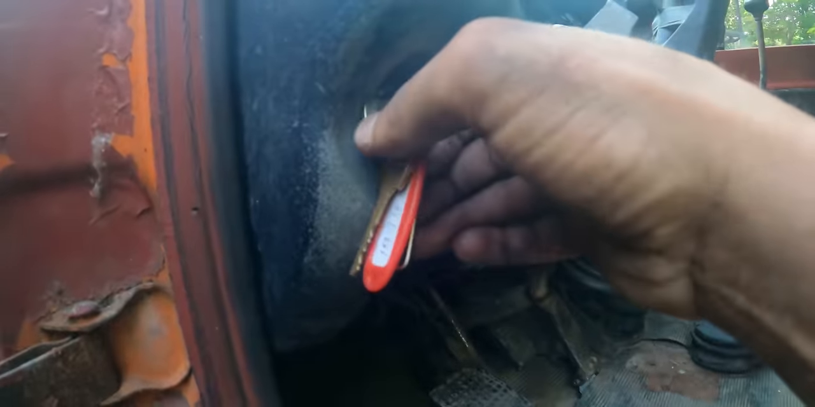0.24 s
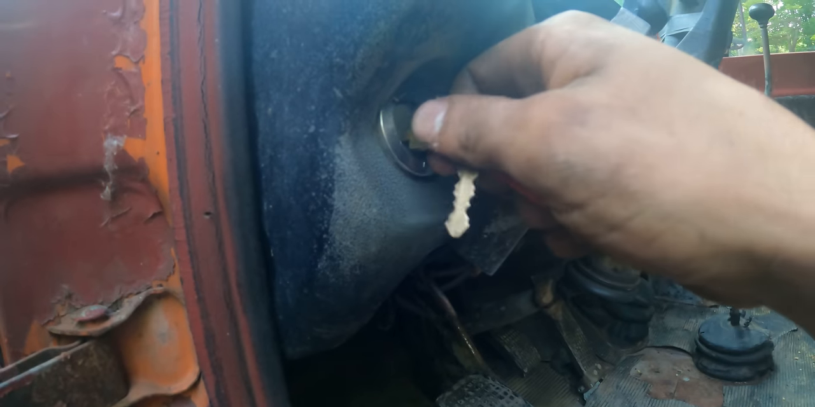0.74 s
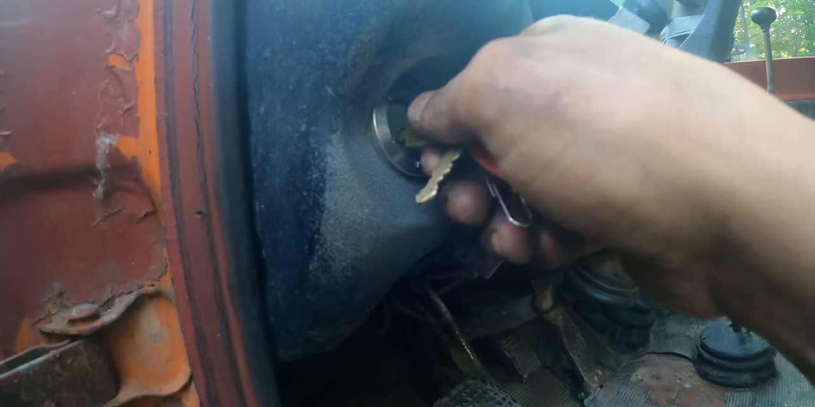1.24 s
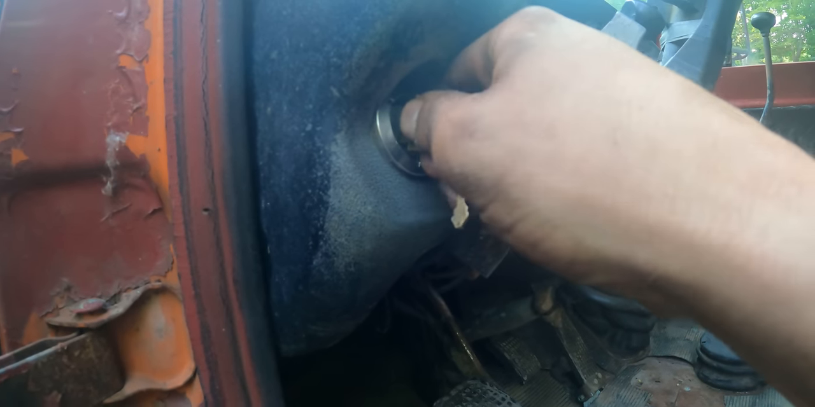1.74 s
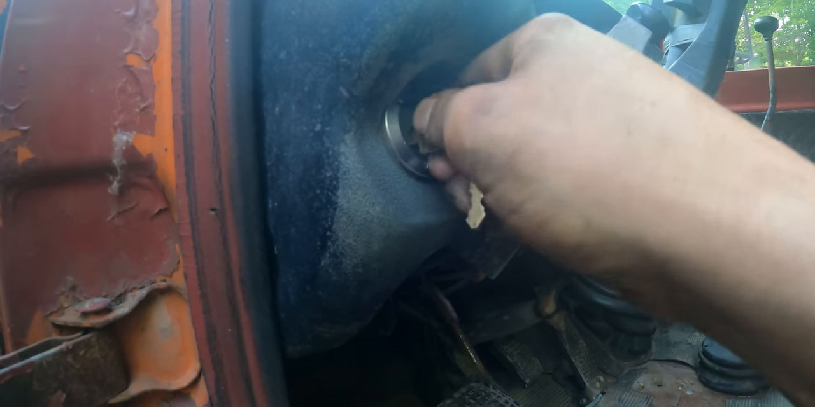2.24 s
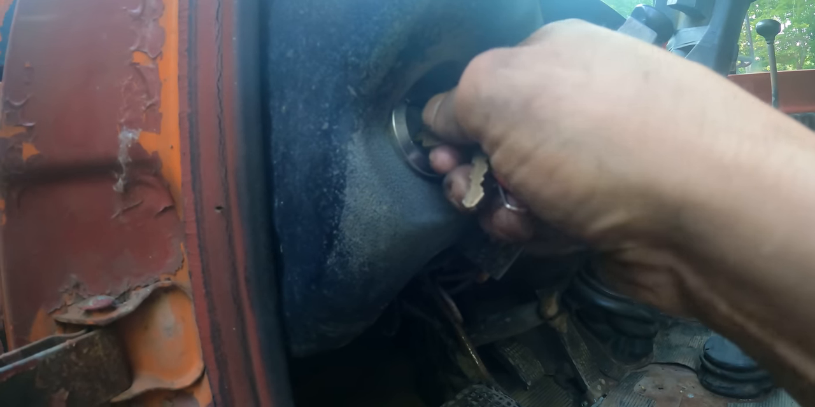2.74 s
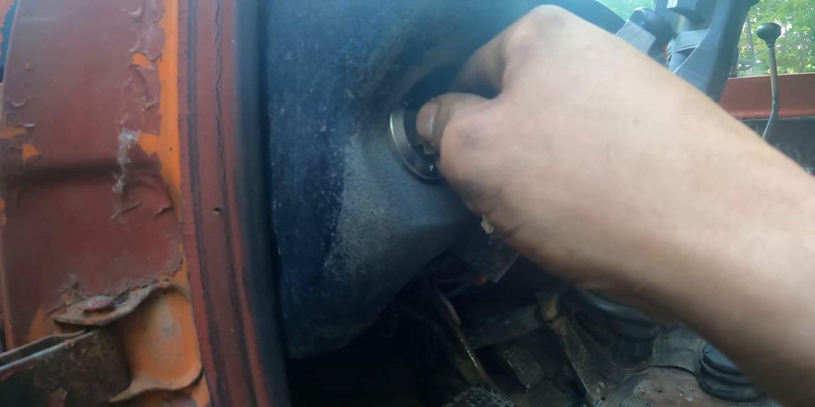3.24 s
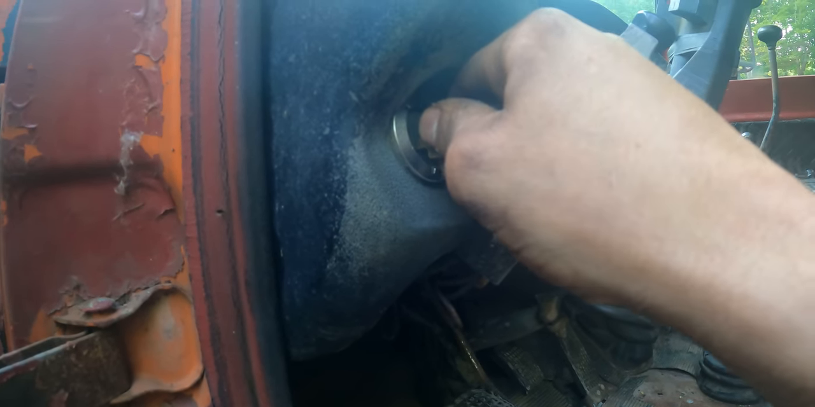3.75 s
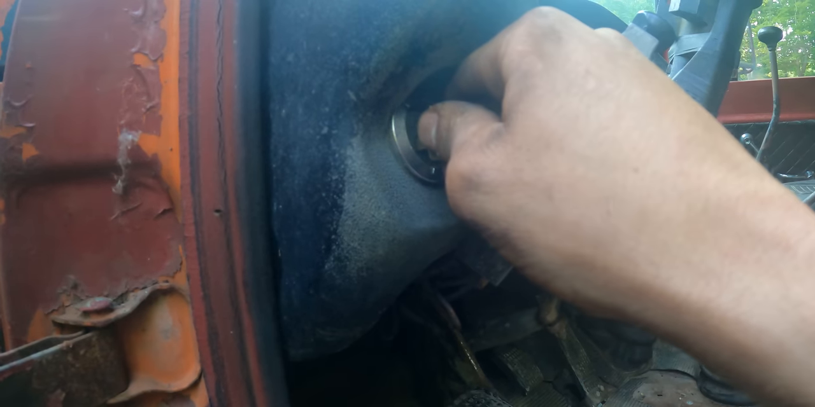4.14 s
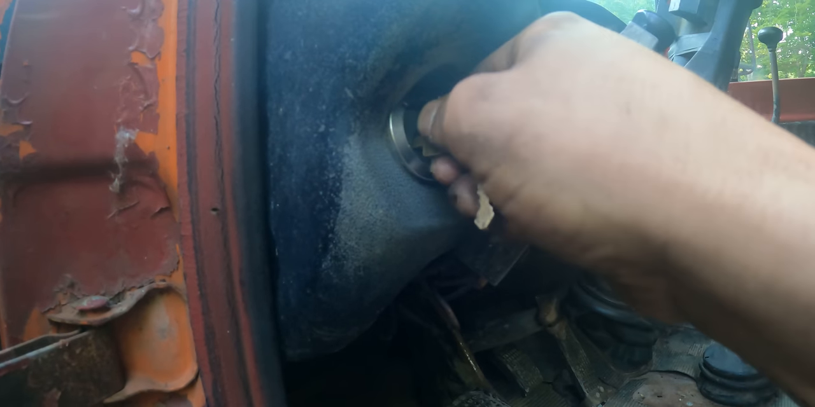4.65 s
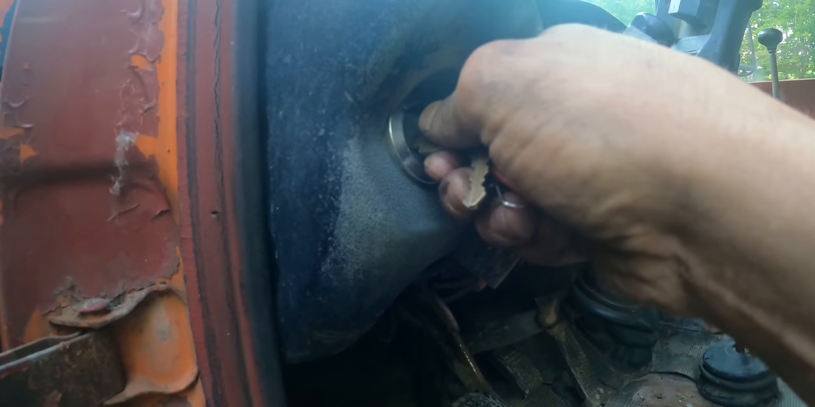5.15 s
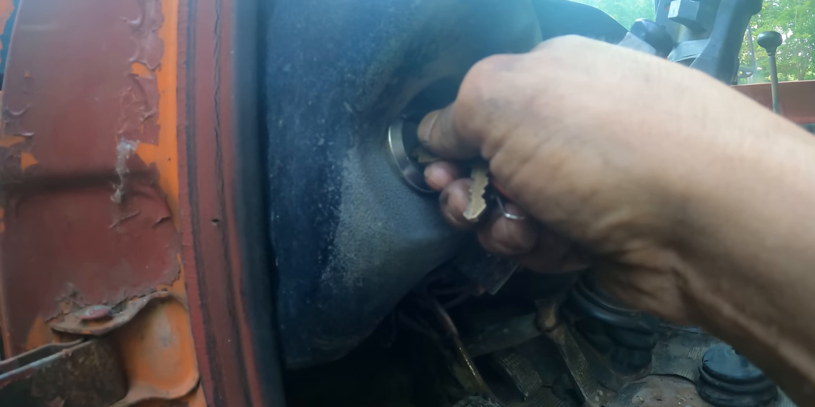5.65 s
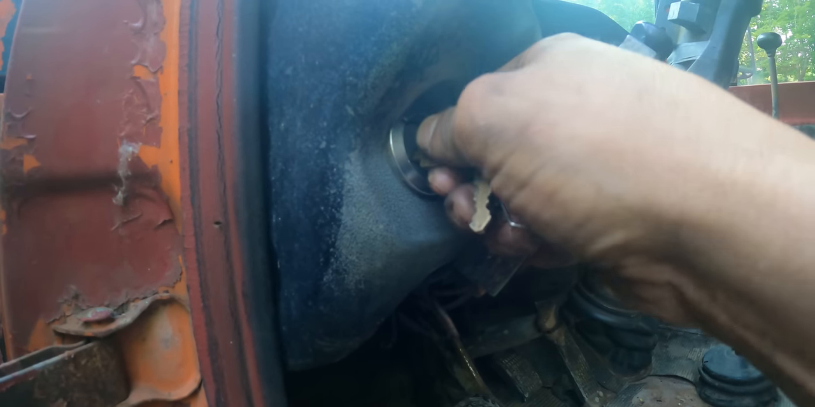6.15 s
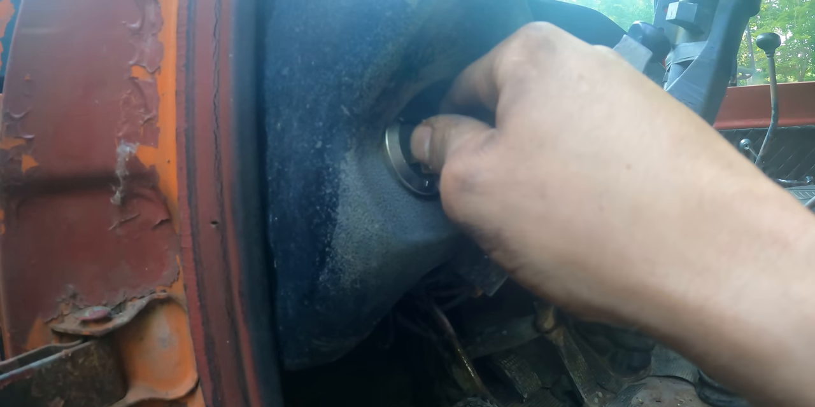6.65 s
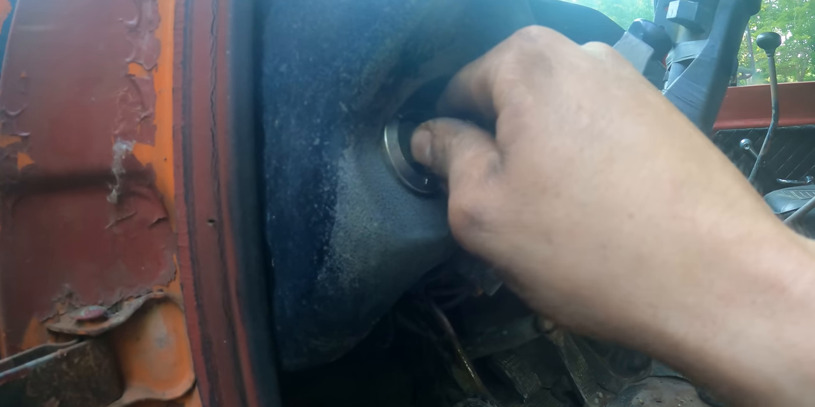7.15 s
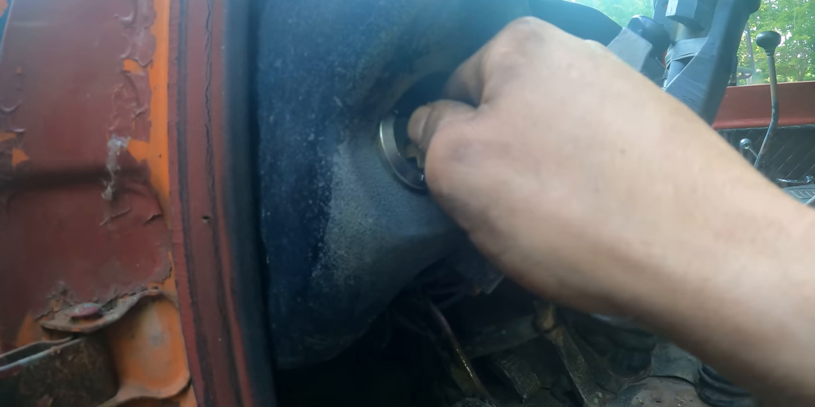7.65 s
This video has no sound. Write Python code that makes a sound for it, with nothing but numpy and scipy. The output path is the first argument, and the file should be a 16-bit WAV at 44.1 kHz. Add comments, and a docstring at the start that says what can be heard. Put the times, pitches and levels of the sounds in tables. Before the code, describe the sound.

Close-up of an ignition switch being worked by hand: bright key clinks with dull dash thuds, a rubbing hiss, and a crisp detent snap. After a quieter pause, a fuel pump jolts on with a low buzzing hum, loose rattles and booming panels, runs about two seconds, winds down and stops on another snap. Soft traffic wash, a faint wavering drone and brief bird phrases lie behind.

```python
"""In the cab of an old truck, a hand turns a key in the steel dash: keys and tag clink, the switch snaps
through its detents. Each contact is a burst of noise that rings the metal and thumps the panel.
An electric fuel pump spins up and runs down; its strokes and rumble shake the cab panels into a loud hum,
and the panels ring out. Outside, a bird of gliding near-sines repeats a short phrase over distant traffic,
made of coloured noise, and a wavering drone."""
import sys
import numpy as np
from scipy import signal
from scipy.fft import rfft, irfft, next_fast_len
from scipy.io import wavfile
from scipy.ndimage import uniform_filter1d

SR = 44100
rng = np.random.default_rng(int(sys.argv[2]) if len(sys.argv) > 2 else 0)


def store_wav(level_fs):
    """Save 16-bit WAV to argv[1]."""
    pcm = np.round(np.clip(np.atleast_2d(level_fs), -1, 1) * 32767)
    wavfile.write(sys.argv[1], SR, pcm.T.astype(np.int16))


N = 347630  # length in samples

# pump motor: switched on, switched off, at rest (s)
ON_S, OFF_S, REST_S = 4.846, 6.59, 7.03
# stroke rate: at the start, at full speed, time to spin up, sag once switched off
START_HZ, FULL_HZ, SPIN_UP_S, SAG_HZ_PER_S = 49.54, 124.2, .354, 170
JOLT_DB, JOLT_S, GRIP_S = 6.5, .03, .004  # extra shake at switch-on, how fast it fades, soft onset
FADE_DB_PER_S = 168.5  # dying away once at rest
# levels at full speed, and gain towards standstill
RUMBLE_DB, RUMBLE_SLOW_DB, HISS_DB, HISS_SLOW_DB = -28.5, 9.5, -61, 11
WHINE_DB = -73  # thin whine of the motor at full speed, before its flutter
KICK_HZ, KICK_DB, KICK_S = 421, -22, .005
LEAD_S = .003  # a contact's noise starts this long before its crack
CHATTER_DB = 3  # random unevenness of the tail before smoothing
CLINK_OCTAVES, CLINK_TAIL_DB = 0.68, -11  # spread of colour; tail under the crack
SNAP_T60_S = 0.2
SWITCH_DB, DASH_DB = -5.5, -5  # ring against the crack
DASH_T60_S = 0.061  # longest ring of the dash under the fingers
TOP_HZ = 15750


def undb(db):
    """Decibels to a plain gain."""
    return 10 ** (np.asarray(db) / 20)


def unit(x):
    """Scale to rms 1."""
    return x / np.sqrt(np.mean(x ** 2))


def columns(rows):
    """Curves at every sample: the first column is time, the others are joined by straight lines."""
    s, *rest = np.transpose(rows)
    return [np.interp(np.arange(N) / SR, s, c) for c in rest]


def pan(x, db):
    """Two channels, the left louder than the right by db."""
    return x * undb(np.array([[db], [-db]]) / 2)


def ring(x, hz, t60):
    """One panel tone, dying by 60 dB in t60 seconds; white noise of rms 1 comes out at rms 1."""
    p = np.exp(2j * np.pi * hz / SR - np.log(1000) / (max(t60, .01) * SR))
    return np.sqrt(2 * (1 - abs(p) ** 2)) * signal.lfilter([1], [1, -p], x).imag


def band(x, hz, width_hz):
    """Resonant band-pass, gain 1 at the centre."""
    return signal.lfilter(*signal.iirpeak(hz, hz / width_hz, fs=SR), x)


def coloured(points):
    """Noise of rms 1 with the given spectrum."""
    hz, db = np.transpose(points)
    size = next_fast_len(N)
    f = np.arange(1, size // 2 + 2) * SR / size
    gain = undb(np.interp(np.log(f), np.log(hz), db, left=db[0] - 44.0, right=db[-1] - 32.0))
    return unit(irfft(rfft(rng.standard_normal(size)) * gain, size)[:N])


def walk(rate):
    """Random levels held 1 / rate s and smoothed twice; spread near 1."""
    k = int(SR / rate)
    held = np.repeat(rng.standard_normal(N // k + 1), k)
    return 1.287 * uniform_filter1d(uniform_filter1d(held, k), k)[:N]


def tint(x, hz, octaves):
    """Spectrum to sound with a bell-shaped colour around hz, peak 1; treble falls off steadily above 9 kHz."""
    f = np.arange(1, len(x) + 1) * SR / (2 * len(x) - 2)
    db = -6 * (np.log2(f / hz) / np.clip(octaves, .04, 3)) ** 2
    db -= 5.6 * np.maximum(f / 1000 - 9.0, 0)
    y = irfft(x * undb(db))
    return y / np.max(abs(y))


def outside():
    """Traffic wash, mostly alike left and right in the bass, with a wavering drone and its octave."""
    # spectrum of the wash: pitch_hz, level_db (per Hz)
    wash_colour = [(15, -47), (32, -0.5), (58, -12), (104, -3.5), (144, -11), (197, -5.5), (278, -20.5),
                   (353, -19), (448, -18), (608, -15.5), (760, -18), (860, -18.5), (960, -14),
                   (1080, -16.5), (1160, -19), (1280, -19.5), (1420, -24.5), (1870, -32), (3100, -44),
                   (3440, -44.5), (6670, -53.5), (10000, -78), (14000, -95)]
    # level of the wash: start_s, level_db
    wash_level = [(0.0, -48), (1.06, -45), (1.75, -46.5), (2.78, -48), (2.98, -49.5), (4.26, -48.5),
                  (5.5, -51.5), (7.3, -54.5), (7.88, -54.5)]
    # gain of the wash's treble: start_s, level_db
    treble_level = [(0, -3), (3, 5), (4.8, 9), (7.1, 7.5), (7.5, 10.5), (7.88, 11.5)]
    # glide of the drone: start_s, pitch_hz, level_db
    drone_glide = [(0, 117.3, -55.5), (0.8, 114.8, -46), (1.5, 108.1, -53.5), (2.2, 106, -49.5),
                   (3, 100.6, -51), (4, 98.3, -56.5), (4.8, 96.8, -62), (7.88, 98, -72)]
    side = signal.lfilter(*signal.butter(2, 330, "high", fs=SR), coloured(wash_colour))
    wash = coloured(wash_colour) + 0.38 * side * np.array([[1], [-1]])
    wash *= undb(columns(wash_level)[0])
    wash *= undb(0.7 * walk(4))
    treble = signal.lfilter(*signal.butter(2, 1600, "high", fs=SR), wash)
    wash += (undb(columns(treble_level)[0]) - 1) * treble
    hz, drone_db = columns(drone_glide)
    phase = 2 * np.pi * np.cumsum(hz * (1 + .01 * walk(10))) / SR
    drone = undb(-7 + 3 * np.tanh(walk(15))) * np.sin(phase + 2.5 * walk(20))
    drone += undb(3 * np.tanh(walk(12))) * np.sin(2 * phase + .5 * walk(14))  # the octave
    return pan(np.ones(1), 1.5) * wash + undb(drone_db) * drone


def whistles():
    """Bird notes and lone tones: soft-edged, slightly rough near-sines that linger among the trees."""
    # notes of the bird's phrase: start_s (within the phrase), length_s, start_hz, end_hz, level_db
    phrase = [(0.006, 0.035, 4500, 4430, -3), (0.043, 0.027, 4280, 3860, -6), (0.061, 0.04, 3850, 3740, -4),
              (0.078, 0.03, 3038, 2876, -6), (0.104, 0.035, 2820, 2700, -2.5),
              (0.13, 0.08, 2626, 2536, -11), (0.136, .075, 3400, 3330, -3.5),
              (.245, 0.06, 2113, 2270, -0.5), (0.298, .08, 2664, 2560, -4)]
    # each time the phrase is sung: start_s, level_db, extra_db of the notes starting above 3600 Hz
    songs = [(1.22, -61, -1.5), (1.718, -60.5, -3), (5.839, -59.5, -7), (6.329, -59.5, -1.5),
             (6.821, -63, 4), (7.326, -60.5, -2)]
    # lone tones: start_s, length_s, start_hz, end_hz, level_db
    tones = [(1.94, 0.063, 371, 381, -41.5), (4.017, 0.056, 3104, 2980, -69.5),
             (5.796, 0.2, 5120, 5160, -64.5), (5.822, 0.051, 1603, 1647, -57)]
    notes = []
    for song_s, song_db, high_db in songs:
        for delay_s, length_s, start_hz, end_hz, db in phrase:
            level_db = song_db + db + high_db * (start_hz > 3600)
            notes.append((song_s + delay_s, length_s, start_hz, end_hz, level_db))
    calls, waver = np.zeros(N + SR), walk(260)
    for start_s, length_s, start_hz, end_hz, db in notes + tones:
        k, i = int(length_s * SR), int(start_s * SR)
        glide = end_hz + (start_hz - end_hz) * np.linspace(1, 0, k) ** 1.2
        waver_hz = .016 * end_hz + .1 * abs(start_hz - end_hz)
        phase = 2 * np.pi * np.cumsum(glide + waver_hz * waver[i:][:k]) / SR
        calls[i:i + k] += undb(db) * np.sin(phase) * np.sqrt(2) * np.hanning(k) ** 0.12
    calls = calls[:N] * (1 + 0.5 * walk(120))  # roughness
    t = np.arange(int(.5 * SR)) / SR
    trees = rng.standard_normal((2, len(t))) * np.exp(-np.log(1000) * t / 0.95)
    echo = signal.fftconvolve(band(calls, 3200, 3000)[None], trees, axes=1)[:, :N]
    return pan(calls, 2.0) * undb(-1.0) + undb(-31.5) * echo


def rustle():
    """Skin and plastic rub: a flickering hiss with tiny ticks."""
    # fingers on keys and tag: start_s, level_db
    rubbing = [(0.0, -74), (0.18, -65), (0.29, -61), (0.8, -60), (0.94, -52.5), (1.13, -65), (1.7, -68.5),
               (2.84, -74), (3.3, -78), (3.6, -81)]
    db = columns(rubbing + [(rubbing[-1][0] + 0.23, -95)])[0]
    # about 300 ticks a second, each fading over 2 ms
    ticks = (rng.random(N) < 300 / SR) * undb(3.6 * np.minimum(rng.exponential(size=N), 4))
    grain = 1 + 0.31 * signal.lfilter([1], [1, -np.exp(-1 / (.002 * SR))], ticks)
    colour = [(1200, -7.5), (2500, 1.5), (4500, 0.0), (7500, -13.5), (10000, -26.0), (14000, -30)]
    hiss = coloured(colour) + .3 * coloured(colour) * np.array([[1], [-1]])
    return undb(db + 2 * walk(47)) * unit(grain) * hiss


def speed():
    """Stroke rate: eases up towards full speed, then sags evenly once the power is cut, to 15 Hz at least."""
    t = np.arange(N) / SR
    hz = FULL_HZ - (FULL_HZ - START_HZ) * np.exp(-(np.maximum(t - ON_S, 0) / SPIN_UP_S) ** 1.45)
    return np.maximum(hz - SAG_HZ_PER_S * np.maximum(t - OFF_S, 0), 15)


def running():
    """Gain of the motor's shaking: off, a jolt, steady, dying away."""
    t = np.arange(N) / SR
    db = JOLT_DB * np.exp(-abs(t - ON_S) / JOLT_S) - FADE_DB_PER_S * np.maximum(t - REST_S, 0)
    return undb(db) * np.sin(np.pi / 2 * np.clip((t - ON_S) / GRIP_S, 0, 1)) ** 2


def pump():
    """Strokes and a rough rumble shake the panels; the fuel hisses and the motor whines from the left."""
    # smaller cab panels: pitch_hz, level_db, t60_s, left_minus_right_db
    panels = [(110, -5, 0.03, 0.8), (180.5, -16, 0.74, -1.5), (204.8, -9, 0.13, -0.5),
              (211.9, -8.5, 0.36, 0.5), (249.7, -8, 0.3, 2), (249.4, -19, 2.33, 2),
              (310.4, -21.5, 0.53, -3.5), (352.9, -9.5, 0.22, 2.5), (387, -10.5, 0.23, 2.5),
              (385, -30.5, 3.6, 2), (396, -36, 2.2, 1), (416, -16, 0.13, -1), (455.8, -25.5, 1.7, 4),
              (462, -31.5, 1.1, 3), (520, -27.5, 0.15, -7.5), (593, -21.5, 0.1, 5.5),
              (680, -28.5, 0.044, 5.5), (935, -36.5, 0.11, 12)]
    # spectrum of the fuel's hiss: pitch_hz, level_db (per Hz)
    hiss_colour = [(700, -13), (1070, -3.5), (1520, -8.5), (2210, -6), (3500, -15), (4900, -16),
                   (5260, -13.5), (5730, -22), (9160, -30), (10300, -39), (10900, -64)]
    # overtones of a stroke: multiple of the stroke rate, level_db
    overtones = [(1, -17), (2, 1.5), (3, -4.5), (4, -13), (5, -16)]
    # level of the strokes: start_s, level_db
    stroke_level = [(4.846, -34), (5.2, -26), (5.4, -36), (5.55, -31), (5.8, -39), (5.95, -28.5),
                    (6.22, -30), (6.36, -39.5), (6.5, -26.5), (6.63, -34), (6.72, -31), (6.85, -30),
                    (7.0, -26)]
    on, slow = running(), 1 - speed() / FULL_HZ  # a slow pump runs rougher
    phase = 2 * np.pi * np.cumsum(speed() * (1 + .003 * walk(30))) / SR
    strokes = sum(undb(db + 1.65 * np.sqrt(k) * walk(18)) * np.sin(k * phase) for k, db in overtones)
    strokes = strokes * undb(columns(stroke_level)[0]) * on
    rumble_db = RUMBLE_DB + RUMBLE_SLOW_DB * slow
    rumble = rng.standard_normal(N) * undb(rumble_db + 0.5 * walk(21)) * on
    shaking = undb(-15.0) * strokes + rumble
    hum = sum(pan((-1) ** k * undb(db) * ring(shaking, hz, t60), left_db)
              for k, (hz, db, t60, left_db) in enumerate(panels))
    direct = undb(-3.5) * strokes + undb(-9) * band(band(rumble, 280, 340), 280, 540)
    since = np.maximum(np.arange(N) / SR - ON_S, 0)
    # the motor jerks into motion
    kick = undb(KICK_DB) * np.sin(2 * np.pi * KICK_HZ * since) * np.exp(-since / KICK_S)
    hum = hum + pan(direct + kick, 2.0)
    # a steep high-pass keeps the hum above about 72 Hz
    hum = signal.sosfilt(signal.butter(4, 72, "high", fs=SR, output="sos"), hum)
    hiss = coloured(hiss_colour) + .5 * np.array([coloured(hiss_colour), coloured(hiss_colour)])
    hiss_db = HISS_DB + HISS_SLOW_DB * slow
    hiss *= undb(hiss_db + 1.5 * walk(15)) * on * np.clip(since / 0.032, 0, 1)
    # the whine sits at 24 times the stroke rate
    hiss += undb(WHINE_DB + 3 * walk(9)) * np.sin(24 * phase) * on * (1 - slow) ** 4
    return hum + pan(hiss, 7.4)


def boom():
    """Low tones of the biggest panels swell as strokes meet them, tremble, then ring on with a level that
    swells and drops."""
    # a panel booms when a multiple of the stroke rate passes its pitch:
    # pitch_hz, width_hz, t60_s, idle_db, then level_db when met by the 1st, 2nd and 3rd multiple
    big_panels = [(91.7, 16, 0.87, -45, -27, -17, -40), (104.8, 4.3, 0.93, -36, -30.5, -16, -40),
                  (132.6, 9.2, 0.42, -41.5, -22.5, -18.5, -22)]
    # level of the boom, rising and dropping also after the pump stops: start_s, level_db
    boom_level = [(4.85, -10.5), (4.98, 4), (5.25, -5.5), (5.42, 3), (5.5, -3), (6.1, 3), (6.5, -0.5),
                  (6.6, -6), (6.72, 2), (6.82, 1.5), (6.95, 4.5), (7.1, -4), (7.55, 7.5), (7.7, -10.5)]
    rate, on, out = speed(), running(), 0
    shaken = np.clip(rate / 30 - 1.2, .15, 1)
    for hz, width_hz, t60, idle_db, *met_db in big_panels:
        push = undb(idle_db)
        for k, db in enumerate(met_db, 1):
            push = push + undb(db) / (1 + ((k * rate - hz) / width_hz) ** 2)
        keep = np.exp(-np.log(1000) / (t60 * SR))
        swell = signal.lfilter([1 - keep], [1, -keep], push * on)
        tone = np.sin(2 * np.pi * np.cumsum(hz * (1 + 0.034 * shaken * walk(24))) / SR)
        out = out + swell * tone * undb(3.65 * shaken * walk(24))
    return np.sqrt(2) * pan(out * undb(columns(boom_level)[0]), .3)


def scrapes():
    """Short scrapes and buzzes: bands of noise that swell and fade."""
    # start_s, length_s, pitch_hz, width_hz, level_db
    strokes = [(0.759, 0.078, 4530, 600, -48), (1.306, 0.27, 5140, 3970, -66),
               (1.886, 0.11, 9470, 3950, -50.5), (5.79, 0.48, 5640, 2060, -63.5),
               (6.569, 0.099, 9200, 3500, -53)]
    out = np.zeros((2, N + SR))
    for start_s, length_s, hz, width_hz, db in strokes:
        k, i = int(length_s * SR), int(start_s * SR)
        noise = band(band(rng.standard_normal(k), hz, width_hz), hz, width_hz)
        out[:, i:i + k] += undb(db) * unit(noise) * np.sin(np.pi * np.linspace(0, 1, k) ** .3) ** 2
    return out[:, :N]


def contact(t, t60, tail_db):
    """Force of one contact: a quick scrape, a crack, a few bounces and a dying chatter."""
    chance = rng.random((3, 2))
    shape = undb(tail_db) * np.exp(-np.log(1000) * t / t60) * np.clip((t - LEAD_S) / 0.0011 + 1, 0, 1)
    uneven = np.repeat(rng.standard_normal(len(t) // 64), 64)  # a new level every 64 samples
    shape *= undb(CHATTER_DB * uniform_filter1d(uneven, 32))
    shape += np.exp(-abs(t - LEAD_S) / np.where(t < LEAD_S, .0004, .0012))  # the crack
    for gap, size in chance:
        late = t - LEAD_S - .004 - .045 * gap
        bounce = np.exp(-late * (late > 0) / .0009) * (late > 0)
        shape += min(3 * t60, .45) * size * bounce * np.exp(-2.5 * gap)
    return shape * rng.standard_normal(len(t))


def rattles():
    """Something loose rattles, from the left, now and then as the pump runs."""
    # start_s, level_db (peak)
    knocks = [(5.004, -40), (5.091, -50), (5.1138, -45.5), (5.154, -45), (5.2645, -50), (5.3542, -55),
              (6.016, -46), (6.2042, -49), (6.238, -51.5), (6.703, -49), (6.7864, -41.5), (6.857, -41),
              (6.9502, -40)]
    out = np.zeros((2, N + SR))
    t = np.arange(8192) / SR
    fade = np.minimum((t[-1] - t) / 0.024, 1)
    for start_s, db in knocks:
        i = int((start_s - LEAD_S) * SR)
        knock = tint(rfft(contact(t, 0.15, -2.5)), 2070, 0.3)
        out[:, i:i + len(t)] += pan(undb(db) * fade * knock, 10.0)
    return out[:, :N]


def contacts():
    """Every contact as (s, dB, Hz, t60, thud dB, octaves, tail dB, treble dB, modes, ring dB)."""
    # keys and tag knock: start_s, level_db, brightest_hz, tail_t60_s, thud_db, treble_db
    knocks = [(0.116, -53, 5000, 0.054, -30, -20), (0.245, -50, 6000, 0.13, -30, -20),
              (0.155, -36, 3500, 0.088, -17.5, -28), (0.269, -37.5, 2540, 0.19, -13.5, -23),
              (0.3141, -32, 2800, 0.88, -37, -21), (0.3346, -14.5, 4830, 0.15, -21, -36),
              (0.3381, -19, 5540, 0.11, -27, -36), (0.3504, -27.5, 1900, 0.16, -39, -40),
              (0.3927, -30, 5200, 0.28, -22, -23), (0.411, -23, 4170, 0.02, -27, -23),
              (0.4173, -22, 5600, 0.013, -39, -15), (0.422, -35, 4800, 0.08, -23, -23),
              (0.471, -40.5, 4860, 0.2, -37, 0), (0.5953, -18, 4600, 0.1, -22, -6),
              (0.6379, -38.5, 3440, 0.13, -6.5, -33), (0.684, -35, 3100, 0.22, -27, -42),
              (0.7565, -40, 4620, 0.15, -27, -25), (0.779, -41, 4720, 0.15, -24, -31),
              (0.858, -20, 4030, 0.064, -16.5, -37), (0.9125, -51, 5070, 0.11, -11, -28),
              (0.9443, -20, 3430, 0.22, -15, -43), (0.96, -34, 5500, 0.052, -26, -14),
              (1.022, -14.5, 4340, 0.14, -16, -16), (1.049, -35, 5000, 0.11, -31, -7),
              (1.1109, -36, 3900, 0.045, -4.5, -26), (1.119, -31.5, 3000, 0.052, -12, -28),
              (1.185, -53.5, 7500, .1, -10, -22), (1.262, -50.5, 3960, 0.099, -7, -30),
              (1.435, -38.5, 4200, 0.16, -14, -31), (1.616, -46.5, 4270, 0.04, -9, -30),
              (1.6393, -26.5, 4330, 0.047, -18, -32), (1.6488, -22.5, 3550, 0.088, -31, -40),
              (1.836, -55, 5014, 0.034, -30, -30), (1.8538, -41.5, 3020, 0.95, -22, -11),
              (1.8925, -29.5, 2800, 0.14, -9, -3.5), (1.9687, -41, 3200, 0.11, -12, -23),
              (1.987, -52, 2790, 0.16, -17, 2), (2.193, -36.5, 3760, 0.065, -15, -16),
              (2.2751, -35.5, 4180, 0.11, -16, -31), (2.3462, -41, 3300, 0.22, -11, -4.5),
              (2.458, -37, 4030, 0.13, -22, -29), (2.8903, -39, 3930, 0.14, -12.5, -36),
              (3.0492, -57, 5590, 0.083, -30, -38), (3.231, -48.5, 2710, 0.16, -21, -19),
              (3.263, -46, 5700, 0.1, -29, -11), (3.3174, -56, 2850, 0.23, -26, -3),
              (3.499, -58, 2780, 0.11, -20, -29), (4.336, -49.5, 4800, 0.31, -12, -25),
              (4.436, -33, 3770, 0.1, -19, -10), (4.5165, -35, 3540, 0.11, -13, -18),
              (4.6785, -47, 2950, 0.25, -25, -28), (4.777, -41, 2860, 0.15, -18, -41),
              (6.513, -50, 5500, 0.59, -23, -44), (6.575, -31.5, 3430, 0.18, -17, 0.5),
              (6.9688, -34.5, 2900, 0.094, -31, -33), (7.444, -56, 6000, 0.17, -18, -10),
              (7.5732, -49, 3300, 0.19, -25, -36), (7.635, -57, 4200, 0.19, -26.5, -38)]
    # the switch snaps into a detent: start_s, level_db, brightest_hz, spread_octaves, thud_db, treble_db,
    # slip_s (how long before landing the cam slips), slip_db (against the landing), tail_db
    snaps = [(2.649, -8, 2980, 1.14, -17.5, -36, 0.0064, -13, -17.5),
             (4.8743, -6.5, 3240, 0.78, -20, -15.5, .0038, -10.5, -18.5),
             (6.9985, -8.5, 3140, 0.58, -23, -22, 0.0075, -21, -20)]
    # tones of the dash: pitch_hz, level_db, t60_s (left free; shortened below)
    dash_tones = [(1800, 1, 0.36), (2205, 4, 0.065), (2980, -11.5, 0.23), (3607, -5, 0.3),
                  (3996, -7.5, 0.44), (4940, 2.5, 0.06), (5200, -12.5, 0.096), (5270, -2.5, 0.11),
                  (5830, -17, 0.54), (6170, -9, 0.18), (6740, -9.5, 0.25), (7700, -5, 0.22)]
    # tones of the switch barrel: pitch_hz, level_db, t60_s
    switch_tones = [(1057, 3.5, 0.07), (1192, -4.5, .06), (1420, -7, .05), (1815, 0, 0.06),
                    (2107, -9, 0.051), (2920, -0.5, 0.013), (3160, 2, 0.02), (3500, -6, 0.057),
                    (3830, -3, 0.03), (4510, -6, 0.11), (4790, -4.5, 0.03), (5700, -2.5, 0.054),
                    (7520, 0.5, 0.028), (8500, -2, 0.014)]
    dash, switch = np.transpose(dash_tones)[:, :, None], np.transpose(switch_tones)[:, :, None]
    dash[2] = np.minimum(dash[2] * 0.17, DASH_T60_S)  # the fingers damp the dash
    rows = [(s, db, hz, t60, thud_db, CLINK_OCTAVES, CLINK_TAIL_DB, treble_db, dash, DASH_DB)
            for s, db, hz, t60, thud_db, treble_db in knocks]
    for s, db, hz, octaves, thud_db, treble_db, slip_s, slip_db, tail_db in snaps:
        # the slip, brighter and broader in colour, then the landing
        for early_s, less_db, broader, higher in [(slip_s, slip_db, 1.1, 1.35), (0, 0, 1, 1)]:
            rows.append((s - early_s, db + less_db, hz * higher, SNAP_T60_S, thud_db,
                         octaves * broader, tail_db, treble_db, switch, SWITCH_DB))
    return rows


def panel_thud(t):
    """The panel answers a contact late with dull noise, its deepest part dying slowest."""
    noise = rfft(rng.standard_normal(len(t)))
    body = unit(tint(noise, 220, 0.77)) * np.exp(t / 0.041)
    body += 0.6 * unit(tint(noise, 1065, 0.2)) + 0.66 * unit(tint(noise, 1818, 0.07))
    body += 1.73 * unit(tint(noise, 1600, 1.0))
    return body * np.exp(-np.log(1000) * t / 0.13) * np.minimum(t / 0.015, 1)


def clinks():
    """Each contact of keys or switch cracks, rings the metal near its own colour and thumps the panel."""
    out = np.zeros((2, N + SR))
    t = np.arange(8192) / SR
    fade = np.minimum((t[-1] - t) / 0.024, 1)
    for s, db, hz, t60, thud_db, octaves, tail_db, treble_db, (f, mode_db, mode_t60), ring_db in contacts():
        # every contact rings the metal a little differently
        chance = rng.standard_normal((2, len(f), 1))
        modes = undb(mode_db + 2.2 * chance[0]) * np.sin(2 * np.pi * f * (1 + .006 * chance[1]) * t)
        modes = np.sum(modes * np.exp(-np.log(1000) * t / mode_t60), axis=0)
        force = rfft(contact(t, t60, tail_db))
        sound = tint(force, hz, octaves)
        sound += undb(ring_db) * tint(force * rfft(modes), hz, 1.41 * octaves)
        sound += undb(thud_db) * panel_thud(t)
        # the after-rattle has its own colour, 1.2 octaves wide
        after = rng.standard_normal(len(t)) * np.exp(-np.log(1000) * t / t60) * np.minimum(t / .006, 1)
        sound += undb(tail_db - 5.5) * tint(rfft(after), 0.96 * hz, 1.2)
        treble = undb(treble_db) * tint(rfft(contact(t, 0.39 * t60, tail_db)), 9900, 1.0)
        # the cab scatters it to both sides
        spread = undb(-16.5) * tint(rfft(contact(t, t60, tail_db + 13.5)), hz, 1.7 * octaves)
        spread += .3 * treble + .2 * np.roll(sound, shift=16)
        both = pan(sound + treble, -1.2) - spread * np.array([[1], [-1]])
        i = int((s - LEAD_S) * SR)
        out[:, i:i + len(t)] += undb(db) * fade * both
    return out[:, :N]


def scene():
    """Everything heard at once, from the background to the keys and switch."""
    return outside() + whistles() + rustle() + pump() + boom() + scrapes() + rattles() + clinks()


def record(dry):
    """A steep filter cuts the highest treble."""
    return signal.sosfilt(signal.ellip(8, .2, 70, TOP_HZ, fs=SR, output="sos"), dry)


dry = scene()
out = record(dry)
store_wav(out)
```